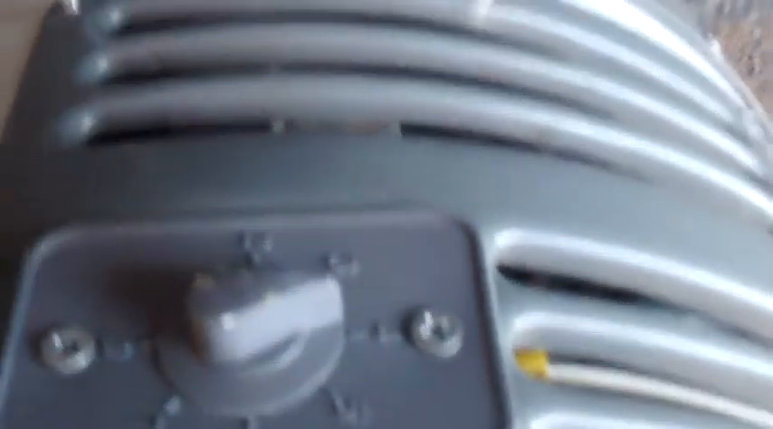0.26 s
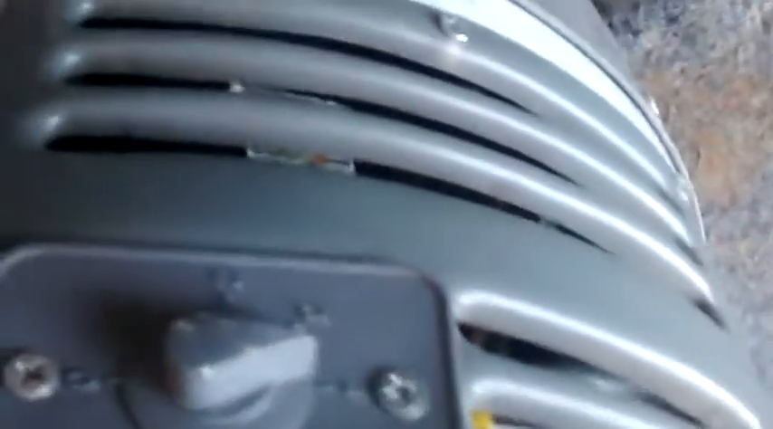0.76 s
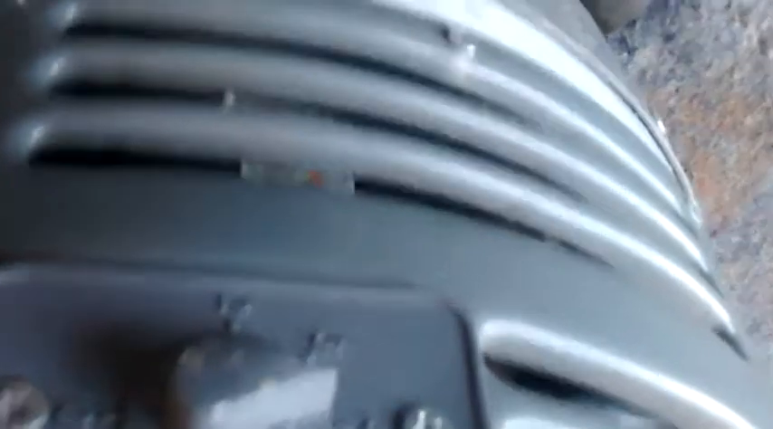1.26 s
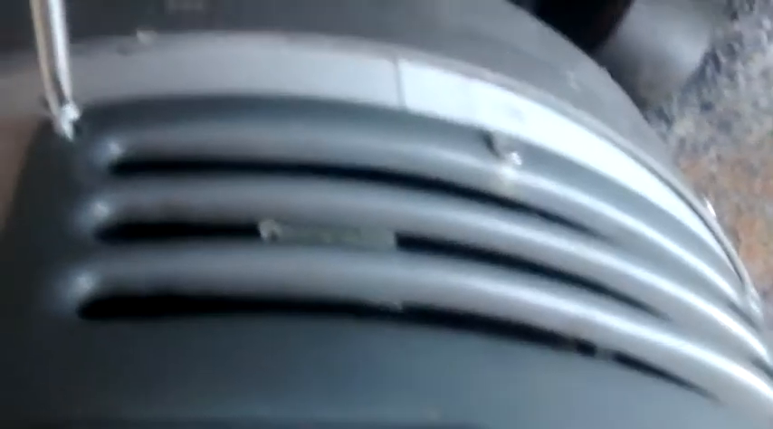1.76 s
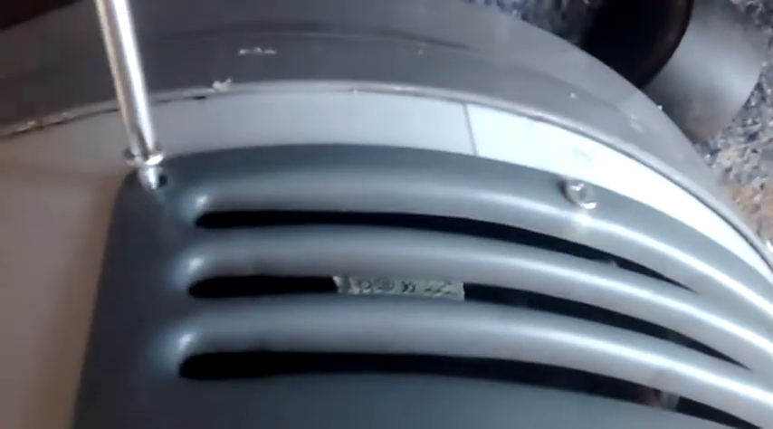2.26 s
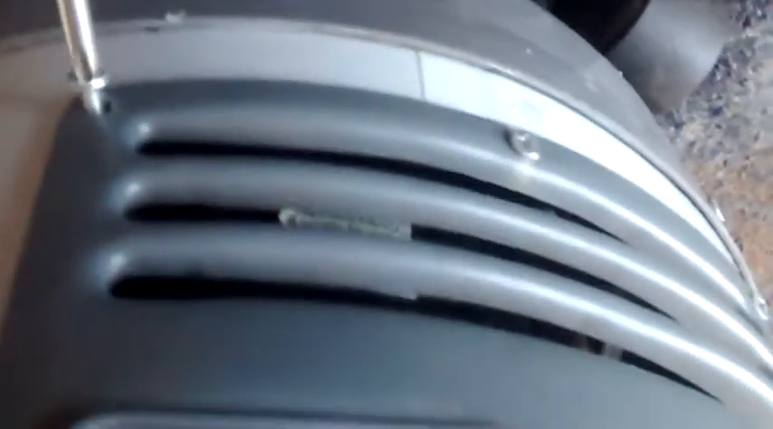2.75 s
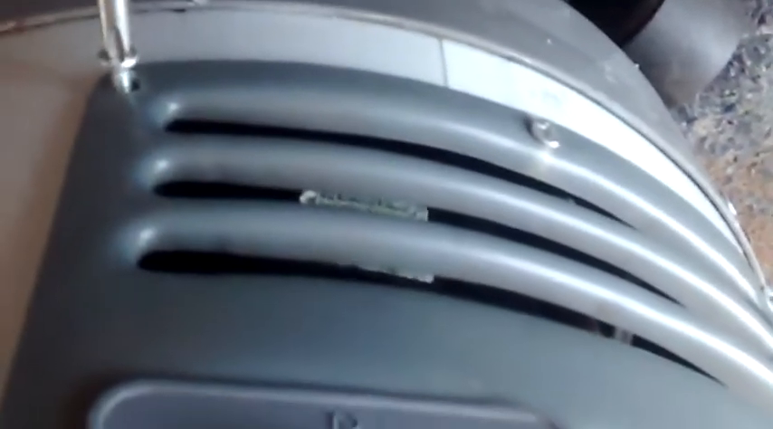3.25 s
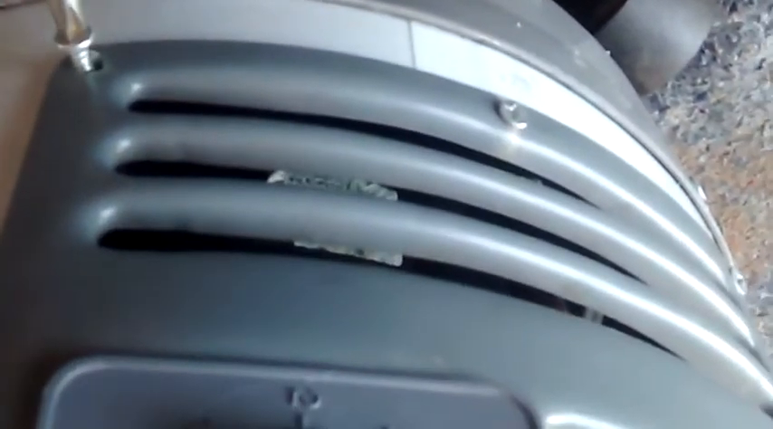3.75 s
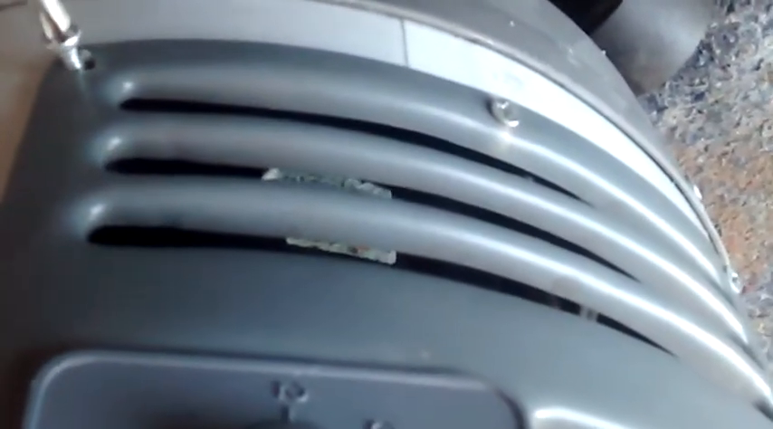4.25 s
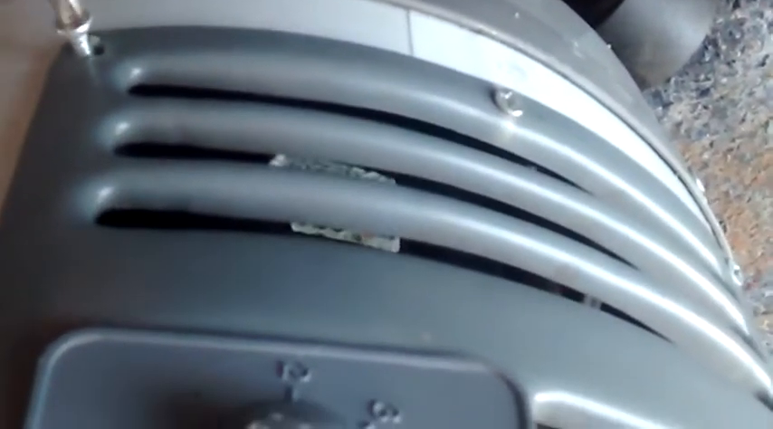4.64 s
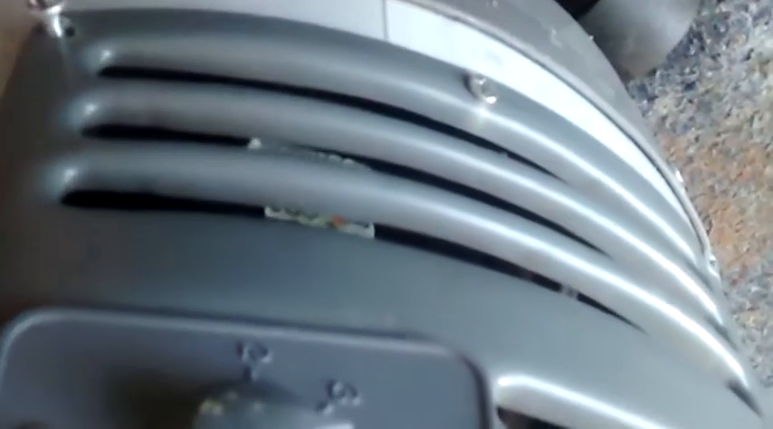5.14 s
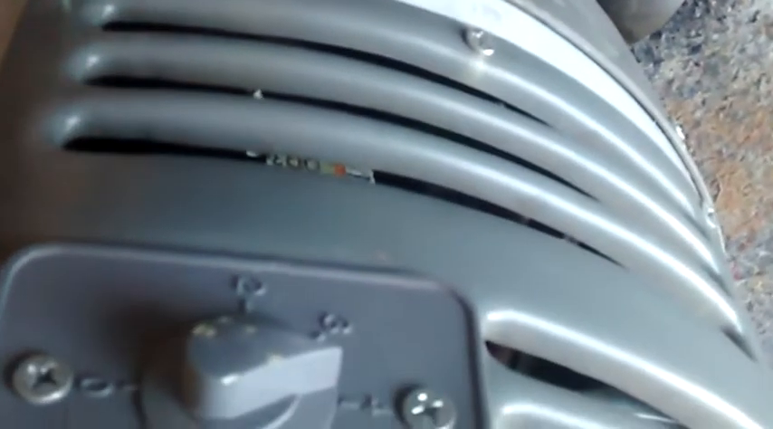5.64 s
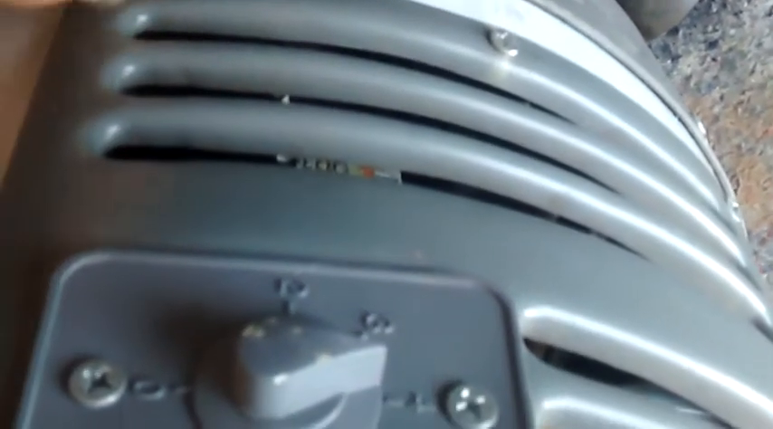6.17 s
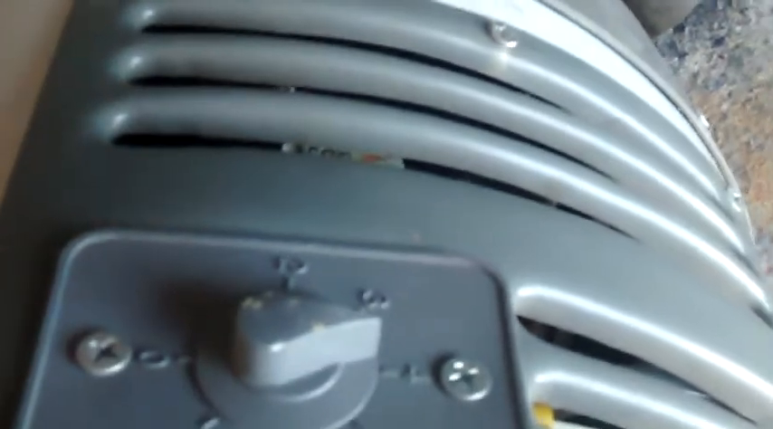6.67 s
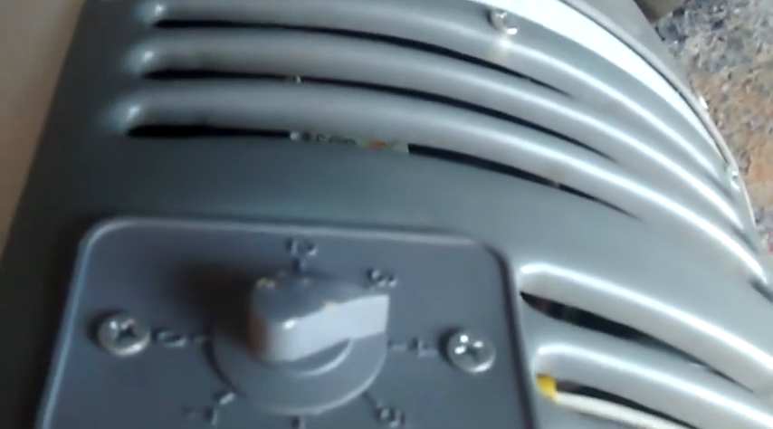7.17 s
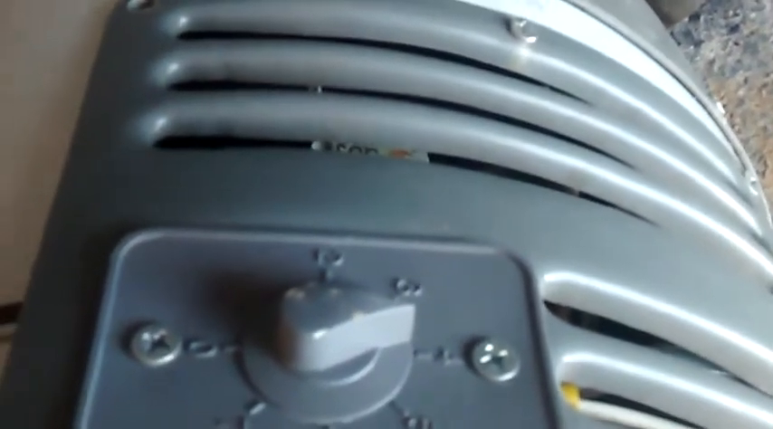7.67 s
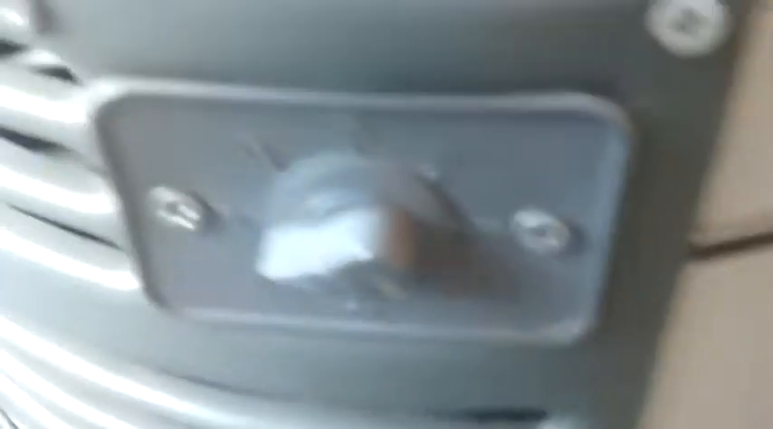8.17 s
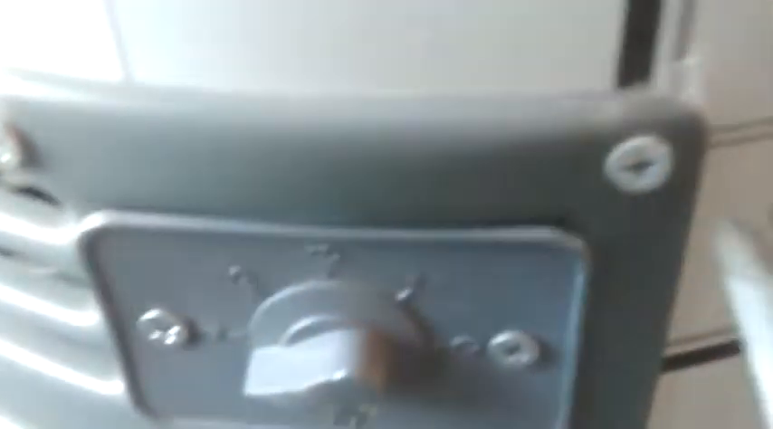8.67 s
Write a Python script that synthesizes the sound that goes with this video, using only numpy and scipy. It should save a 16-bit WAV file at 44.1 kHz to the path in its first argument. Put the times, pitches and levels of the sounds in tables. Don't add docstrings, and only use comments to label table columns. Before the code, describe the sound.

A continuous machine drone fills a close stereo pickup indoors: low-heavy rushing air, mains hum, faint whistle and fluttering high whine, all swaying slightly with the hand. Over it come a few muted knuckle knocks, barely audible singing grille bars, a firm plastic knock, then small steel ticks and scrapes. A final crack marks the microphone turning away, changing the air's colour.

```python
import sys
import numpy as np
from scipy import signal
from scipy.fft import rfft, irfft, next_fast_len
from scipy.io import wavfile
from scipy.ndimage import uniform_filter1d

SR = 44100
rng = np.random.default_rng(int(sys.argv[2]) if len(sys.argv) > 2 else 0)


def log_audio(samples):
    frames = np.atleast_2d(samples).T
    limited = np.clip(frames, -1, 1)
    pcm = np.round(limited * 32767).astype(np.int16)
    wavfile.write(sys.argv[1], SR, pcm)


def convert_level_to_amplitude(level_db):
    exponent = np.asarray(level_db, float) / 20
    return 10 ** exponent


N = 392931
SIZE = next_fast_len(N + 4096, True)
T = np.arange(N) / SR
F = np.maximum(np.fft.rfftfreq(SIZE, 1 / SR), 1)


def shape(table, col=1):
    table = np.array(table)
    return np.interp(np.log(F), np.log(table[:, 0]), table[:, col])


def curves(table):
    s, *columns = np.transpose(table)
    return [np.interp(T, s, c) for c in columns]


def walk(rate):
    k = int(SR / rate)
    count = N // k + 2
    joined = np.interp(T * rate, np.arange(count), rng.standard_normal(count))
    return 1.36 * uniform_filter1d(joined, k)


def tone(hz, db, start=0.):
    return np.sqrt(2) * convert_level_to_amplitude(db) * np.sin(2 * np.pi * np.cumsum(hz + 0 * T) / SR + start)


def ring(push, modes):
    t = np.arange(int(.15 * SR)) / SR
    body = np.zeros(len(t))
    for k, (hz, db, t60) in enumerate(modes):
        fade = np.exp(-np.log(1000) * t / t60)
        body += (-1) ** k * convert_level_to_amplitude(db) * fade * np.sin(2 * np.pi * hz * t)
    return np.convolve(body, push)[:len(t)]


def add(out, s, sound, peak_db, pan_db):
    i = int(s * SR)
    sound = sound * convert_level_to_amplitude(peak_db) / np.abs(sound).max()
    out[:, i:i + len(sound)] += sound * convert_level_to_amplitude(np.array([[pan_db], [-pan_db]]) / 2)


def fan_air():
    # (f/Hz, level/dB per Hz)
    low_air = [(10, -56), (28, -60.5), (62, -84), (100, -71.5), (122, -61), (145, -60.5), (178, -52),
               (200, -57), (215, -63.5), (300, -70.5), (470, -72), (600, -66.5), (700, -73), (800, -80)]
    # (f/Hz, level/dB per Hz)
    high_air = [(800, -82), (900, -76), (1000, -84), (1080, -86.5), (1430, -88), (1700, -85.5),
                (1980, -82.5), (2200, -89.5), (2850, -95), (3450, -99.5), (4200, -96.5), (5300, -100),
                (9000, -105), (15000, -116.5)]
    # (f/Hz, width/Hz, level above the air/dB)
    cabinet = [(132.9, 11.4, 5.5), (260.8, 20, 5), (357, 5.1, 2), (361, 16, 4), (396, 15.7, 6.5),
               (409.3, 6, -11), (430, 18, 3.5), (526, 13, 6), (547.4, 14, 3.5), (566.4, 15, -4.5),
               (587, 23, 3), (645, 16, 2), (678, 9.2, 2), (832, 13, 2.5), (864, 15, 2), (878, 11, 4),
               (930, 29, 2), (1208, 51, 6.5), (1316, 39, 8.5), (1393, 11, 4.5), (1505, 31, 5.5),
               (1562, 20, 4.5), (2360, 71, 7), (2420, 79, -7.5), (2536, 320, 8.5), (6290, 220, 4),
               (7120, 170, 5), (7870, 130, 6), (8250, 110, 2)]
    # (t/s, level of the middle air/dB)
    nearness = [(0, 2), (1.6, 0.94), (5.2, 0), (7.9, 0.3), (8.3, 0), (8.55, 1.5), (8.9, -1.5)]
    air_db, swell_db, flicker_db = -0.5, 0.38, 0.5
    fan_hz, blade = 25.72, 0.067
    db = air_db + np.where(F < high_air[0][0], shape(low_air), shape(high_air))
    for hz, width, boost_db in cabinet:
        db = db + boost_db / (1 + (2 * (F - hz) / width) ** 2)
    white = rfft(rng.standard_normal((2, SIZE))) * convert_level_to_amplitude(db) * np.sqrt(SR / 2)
    out = 0
    swell = walk(0.896)
    middle_db = curves(nearness)[0]
    centres = 60 * 4. ** np.arange(5)
    for hz, lift in zip(centres, (0.16, 0.52, 1.0, 0.36, 0.078)):
        octaves = np.log2(np.clip(F, centres[0], centres[-1]) / hz)
        share = np.cos(np.pi / 4 * np.clip(octaves, -2, 2)) ** 2
        band = irfft(white * share, SIZE)[:, :N]
        out = out + band * convert_level_to_amplitude(swell_db * swell + flicker_db * walk(9) + lift * middle_db)
    return out * (1 + blade * np.sin(2 * np.pi * fan_hz * T) + blade * np.sin(4 * np.pi * fan_hz * T))


def motors():
    # (f/Hz, rms level/dB, level wobble/dB, pitch wobble/Hz)
    hum_tones = [(59, -73, -4, 0.054), (76.3, -69, 0, .2), (120.46, -39, 1.3, 0.043),
                 (129.2, -44, -1, 0.31), (198.2, -46.5, 0.5, 0.72), (220.7, -67, -9, 0.35),
                 (390.3, -61, 2, 0.43)]
    # (t/s, f/Hz)
    fan_speed = [(0, 792.5), (.7, 787.5), (1, 790.5), (2.25, 793), (2.4, 788.5), (3.15, 793), (3.32, 787),
                 (3.68, 793), (3.9, 786.5), (4.3, 791.5), (5.2, 789.5), (6.05, 790.5), (6.4, 795.5),
                 (6.7, 784.5), (7.3, 792), (7.6, 784.5), (8, 791), (8.9, 793)]
    mains_hz, whistle_db = 121, -53.5
    hum = np.zeros(N)
    for hz, db, wobble_db, drift_hz in hum_tones:
        hum += tone(hz + drift_hz * walk(3.01), db + wobble_db * walk(4), 7 * rng.random())
    hz = uniform_filter1d(curves(fan_speed)[0], size=4000) + 1.6 * walk(14)
    below = tone(hz - mains_hz, whistle_db - 7 + 2.5 * walk(3.1))
    above = tone(hz + mains_hz, whistle_db - 12.5 + 2.3 * walk(2.94))
    whistle = tone(hz, whistle_db - 0.07 * T + 1.6 * walk(5.5))
    return hum + whistle + below + above


def compressor(swung):
    # (t/s, rms level/dB)
    slot_level = [(0, -57), (.45, -54), (1.15, -53.5), (1.4, -56), (1.8, -60.5), (2.4, -56), (2.75, -58),
                  (3.1, -55.5), (3.45, -56.5), (3.85, -52.5), (4.2, -57), (4.85, -57), (5.4, -53.5),
                  (5.8, -56), (5.95, -60), (6.5, -60.5), (7.05, -57), (7.4, -55.5), (7.7, -61),
                  (8.9, -65.5)]
    # (t/s, level/dB, phase/rad)
    lower_sides = [(0, 0, -.2), (1.8, 1, -.4), (2.2, 0, .8), (4.6, -1, .8), (5.2, -11, .8), (8.9, -13, .8)]
    side_levels = [-22, -12, -6, -6, -7, -14, -27, -29, -18, -26, -28]
    gain_db, aside_db, hiss_db = 2, -5, -14.5
    upper_rad, throb_smear = -.6, 0.19
    hz = 1988.5 + (1980.2 - 1988.5) * np.exp(-T / 5.5)
    shaft_hz = 58.38 - .14 * np.exp(-T / 2.)
    phase = 2 * np.pi * np.cumsum(hz) / SR
    turn = 2 * np.pi * np.cumsum(shaft_hz) / SR + 2.05
    db = curves(slot_level)[0] + gain_db + aside_db * swung + 0.8 * walk(9)
    lower_db, lower_rad = curves(lower_sides)
    whine = convert_level_to_amplitude(db + 0.37 * walk(9.9)) * np.sin(phase)
    for turns, side_db in zip([k for k in range(-4, 8) if k], side_levels):
        level = db + side_db + lower_db * (turns < 0) + 1.4 * walk(4.44)
        start = lower_rad if turns < 0 else upper_rad
        whine = whine + convert_level_to_amplitude(level) * np.sin(phase + turns * turn + throb_smear * turns ** 2 + start)
    resonance = 1 / (1 + (2 * (F - 1965) / 200) ** 2)
    hiss = irfft(rfft(rng.standard_normal(SIZE)) * resonance, SIZE)[:N]
    puffs = (1.2 + np.cos(turn)) * hiss
    return np.sqrt(2) * whine + convert_level_to_amplitude(db + hiss_db) * puffs / np.std(puffs)


def knocks():
    # (t/s, peak level/dB, left minus right/dB, contact/ms, crack level/dB)
    knock_list = [
        (0.002, -26.5, -2, 1.4, -30),
        (2.452, -32, -8, 2, -39),
        (2.676, -26.5, -1, 1.5, -40),
        (6.195, -14.5, 0, 0.29, -25),
        (6.2203, -33, -1, 0.84, -30),
        (7.87, -28.5, -6, .6, -14),
    ]
    # (f/Hz, level/dB, 60 dB fade time/s)
    cover = [(640, -11, 0.04), (322, -8, 0.075), (496, -7, 0.018), (379, -10, 0.084), (577, -8, 0.03),
             (427, -10, .07), (546, -11, 0.12), (1320, -11, 0.012), (1860, -8.5, 0.017), (2430, -9, 0.013),
             (2780, -9, 0.01), (3400, -9, .003), (4100, -7, .003), (4850, -5, .003)]
    rattle_db, rattle_ms = -13.5, 12.6
    out = np.zeros((2, N + SR))
    t = np.arange(400) * 1000 / SR
    after = np.arange(4000) * 1000 / SR
    grit = rng.standard_normal((len(knock_list), 400))
    band = signal.butter(2, (378, 900), "band", fs=SR, output="sos")
    rattle = signal.sosfilt(band, rng.standard_normal((len(knock_list), 4000)))
    rattle_fade = np.exp(-after / rattle_ms) * np.clip(after / 5, 0, 1) ** 2
    for (s, db, pan_db, ms, crack_db), g, r in zip(knock_list, grit, rattle / rattle.std()):
        thump = ring(np.hanning(int(ms * SR / 1000) + 3), cover)
        thump = thump / np.abs(thump).max()
        crack = uniform_filter1d(uniform_filter1d(g * np.exp(-t / 2.5), size=5), size=3)
        thump[:400] += convert_level_to_amplitude(crack_db) * crack
        thump[:len(r)] += convert_level_to_amplitude(rattle_db) * r * rattle_fade
        add(out, s, thump, db, pan_db)
    return out[:, :N]


def singing():
    # (t/s, length/s, f/Hz, rms level/dB)
    bar_tones = [
        (0.396, 0.089, 427, -51),
        (0.699, 0.19, 424, -48.5),
        (4.479, 0.15, 421, -48),
        (4.48, 0.16, 1006, -59),
        (5.472, 0.19, 882, -56),
        (6.2, .007, 1860, -42),
        (6.217, 0.011, 1940, -46),
    ]
    out = np.zeros(N)
    for s, length, hz, db in bar_tones:
        i, n = int(s * SR), int(length * SR)
        out[i:i + n] += 2 * convert_level_to_amplitude(db) * np.hanning(n) * np.sin(2 * np.pi * hz * T[:n])
    return out


def ticks():
    # (t/s, peak level/dB, grille against tip/dB, shank
    # against tip/dB, scrape/ms)
    tick_list = [(5.334, -42, 12, 6, 2.5), (6.1825, -43, -20, -12, 1.5), (6.1950, -40, -12, -14, .5),
                 (7.8695, -51, -2, -8, .5), (6.578, -29, 0, -6, 0.45), (6.5792, -27.5, 16, -6, .5),
                 (6.5803, -36, 6, -8, .6), (6.5958, -33.5, -20, -20, .7), (6.5982, -44, -18, 0, .6),
                 (6.6028, -42, -6, -1, 1.2), (6.628, -48, -8, -10, .8), (6.6333, -41, -7, 11, 3),
                 (6.6762, -28.5, -24, -5, 0.45), (6.6774, -29.5, -18, 11, .5), (6.6796, -30, -18, 0, .9),
                 (6.6934, -43, -14, 12, 1.5)]
    # (f/Hz, level/dB, 60 dB fade time/s)
    grille = [(1890, 3.5, 0.011), (2320, -3, .005), (2750, -4, 0.0046), (3370, -5, 0.004),
              (4300, -4, 0.0066)]
    # (f/Hz, level/dB, 60 dB fade time/s)
    shank = [(2910, 1, 0.0075), (3650, -3.5, 0.0034), (4300, -0.5, 0.015), (4930, -3, 0.0057),
             (5400, -6.5, 0.0034), (6120, -8, 0.016)]
    # (f/Hz, level/dB, 60 dB fade time/s)
    tip = [(5600, -1, 0.0021), (6500, 1, 0.0026), (7540, -0.5, 0.0026), (8330, 1, 0.0047),
           (9030, -1.5, 0.0032), (9900, -5, 0.0044), (11000, -12, .002), (12400, -11, 0.0028),
           (13700, -9, .003)]
    detune, grit_db, pan_db = .04, 9, 4.5
    out = np.zeros((2, N + SR))
    t = np.arange(400) * 1000 / SR
    grit = rng.standard_normal((len(tick_list), 400))
    blunt = signal.butter(4, 15000, fs=SR, output="sos")
    for (s, db, grille_db, shank_db, ms), g in zip(tick_list, grit):
        push = g * np.abs(g) * np.exp(-(t / ms) ** 2) + 6.4 * (t == 0)
        touched_tip = np.array(tip) * (1 + detune * g[-1], 1, 1)
        sound = convert_level_to_amplitude(shank_db) * ring(push, shank)
        sound += convert_level_to_amplitude(grille_db) * ring(push, grille)
        sound += ring(push, touched_tip)
        sound[:400] += convert_level_to_amplitude(grit_db) * uniform_filter1d(uniform_filter1d(push, size=3), size=2)
        add(out, s, signal.sosfilt(blunt, sound), db, pan_db)
    return out[:, :N]


def ports(air, tones, hits, table, colour_db):
    lag = 16
    like = np.clip(shape(table, col=3), 0, 1)
    lean = convert_level_to_amplitude(shape(table) / 2)
    air = rfft(air, SIZE) * convert_level_to_amplitude(colour_db)
    tones, hits = rfft(tones, SIZE), rfft(hits, SIZE)
    right_air = like * air[0] + np.sqrt(1 - like ** 2) * air[1]
    left = (air[0] + tones) * lean + hits[0]
    right = (right_air + tones) / lean + hits[1]
    left = left * np.exp(1j * (shape(table, col=2) - np.pi))
    right = -right * np.exp(-2j * np.pi * F * lag / SR)
    return irfft(np.array([left, right]), SIZE)[:, :N]


def waver(left, right):
    lag_samples, shade_db, rate = .12, 1.6, 7.
    bins = rfft(right, SIZE)
    slope = irfft(bins * 2j * np.pi * F / SR / (1 + (F / 5000) ** 4), SIZE)[:N]
    upper = irfft(bins / (1 + (2400 / F) ** 8) / (1 + (F / 6500) ** 8), SIZE)[:N]
    shade = convert_level_to_amplitude(shade_db * walk(rate)) - 1
    return np.array([left, right + lag_samples * walk(rate) * slope + shade * upper])


def scene():
    # (f/Hz, left minus right/dB, left leads/rad, likeness 0-1)
    facing = [(30, -3, 3, 0.97), (115, -6, 2.0, 0.95), (195.5, 0, 1.69, 0.99), (404, 1.5, 0.35, 0.85),
              (606, 5.5, -0.41, 0.95), (746, 7, -0.43, 0.78), (822, -0.5, -2.5, 0.98),
              (960, 5, -1.76, 0.74), (1080, 2.5, -2, 0.67), (1330, 2, -3, 0.92), (1640, 1.5, -3, 0.81),
              (1940, 0, -3, 0.97), (2240, 6.5, -2.5, 0.75), (2270, 1, -3, 0.92), (2580, -0.5, -3, 0.99),
              (2750, 1.6, -3, 0.99), (2980, 0.5, -3, 0.84), (3130, 0.5, -3.05, 0.73), (3450, 2, -2.5, 0.55),
              (3930, -2, -2.5, 0.9), (4250, 2.4, -3, 0.8), (4700, 2.5, -3.5, 0.5), (5160, 1.5, -3, 0.78),
              (7950, 3, -3, 0.63), (11900, -2.5, -2.5, 0.3)]
    # (f/Hz, left minus right/dB, left leads/rad, likeness 0-1)
    turned = [(30, -5, 3, 0.97), (120, -0.5, 1.87, 1), (198, -3.5, 1.6, 0.99), (440, 4, 0.63, 0.81),
              (495, 3.5, -0.3, 1), (900, 2.5, -1.85, 0.82), (1370, -3, -4, 1), (1710, -6, -2.5, 0.4),
              (2060, -10, -7.5, 0.94), (2620, 0.5, -9, 0.89), (3150, -.9, -9, 0.22), (4470, 1, -8, 0.41),
              (7500, 1.5, -9.5, 0.8), (12100, -4, -6, .1)]
    # (f/Hz, level/dB)
    aside = [(200, -1.5), (380, 2.5), (470, -4), (650, 1), (800, 2.5), (940, 2.5), (1250, 1.5), (1420, 1.5),
             (1520, 3), (1900, -5.5), (2400, -1.5), (3700, 2.5), (5000, -0.5), (8000, -3), (13500, -1.5)]
    swung = np.interp(T, (7.93, 7.955), (0, 1))
    air = fan_air()
    tones = motors() + compressor(swung) + singing()
    hits = knocks() + ticks()
    before = ports(air, tones, hits, facing, 0)
    after = ports(air, tones, hits, turned, shape(aside))
    left, right = (1 - swung) * before + swung * after
    return waver(left, right)


def band_limit(x):
    return signal.sosfilt(signal.butter(12, 15470, fs=SR, output="sos"), x)


def record(dry):
    top = np.where(F > 15130, convert_level_to_amplitude(-8), 1)
    mix = irfft(rfft(dry, SIZE) * top, SIZE)[:, :N]
    return band_limit(mix)


dry = scene()
out = record(dry)
log_audio(out)
```